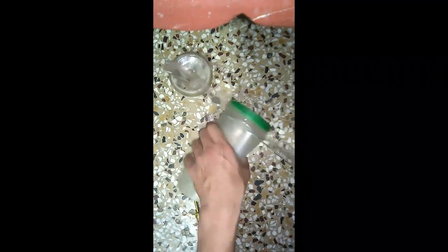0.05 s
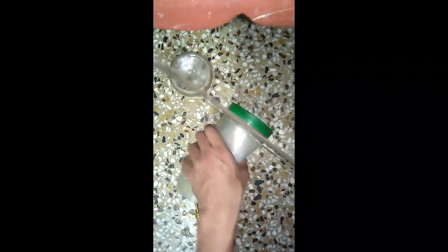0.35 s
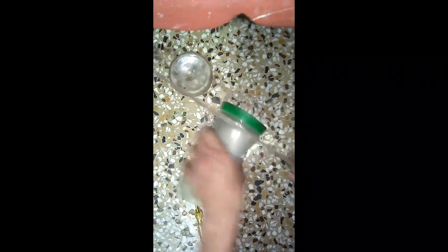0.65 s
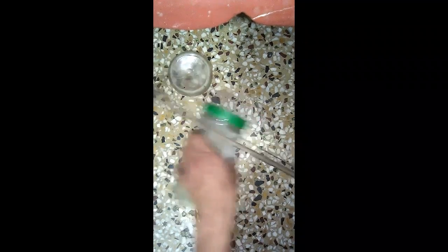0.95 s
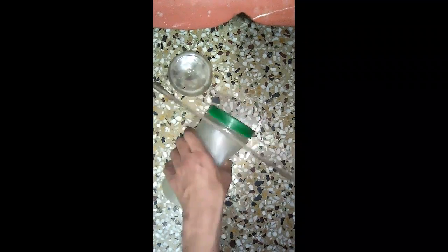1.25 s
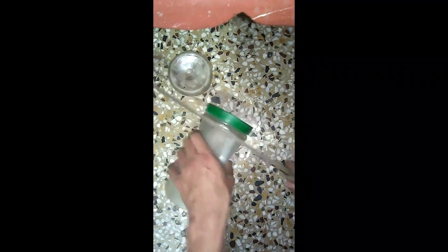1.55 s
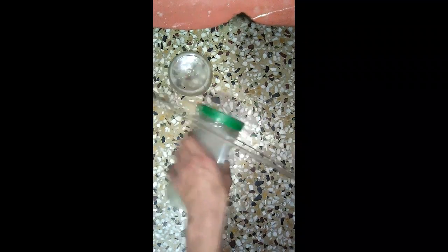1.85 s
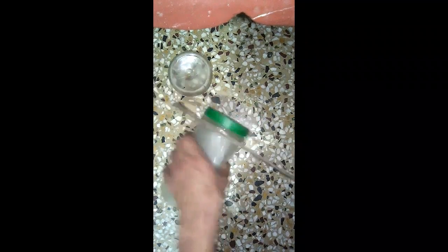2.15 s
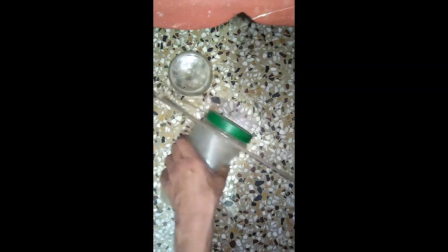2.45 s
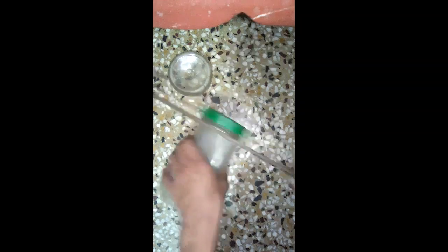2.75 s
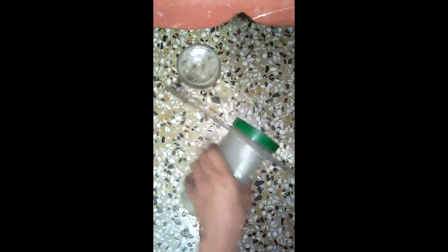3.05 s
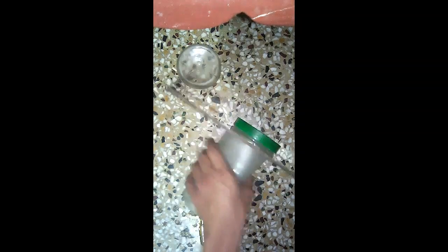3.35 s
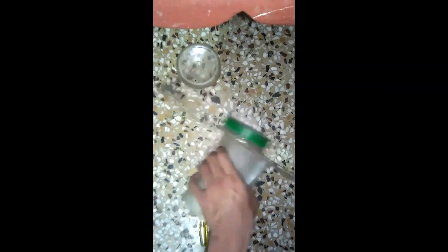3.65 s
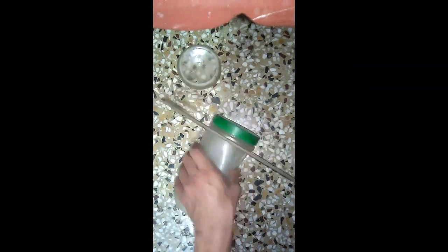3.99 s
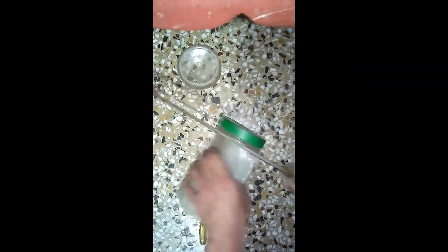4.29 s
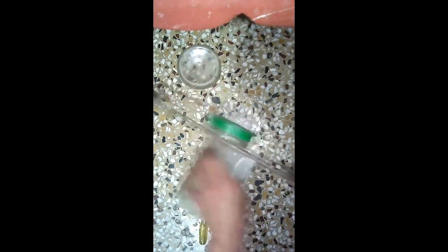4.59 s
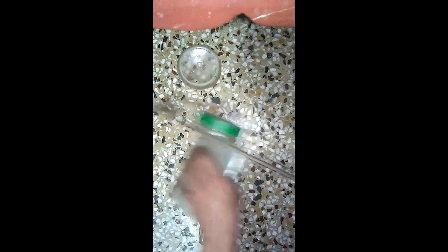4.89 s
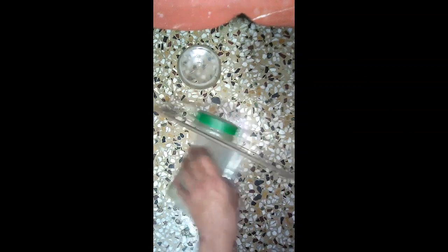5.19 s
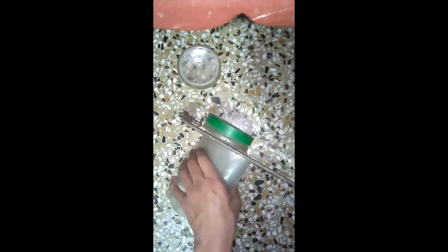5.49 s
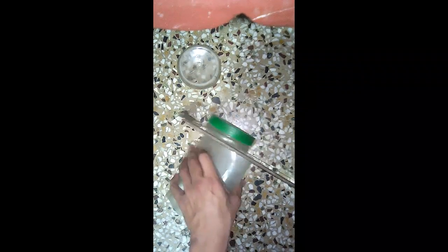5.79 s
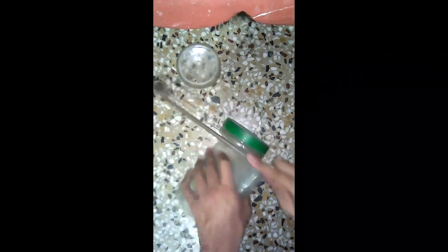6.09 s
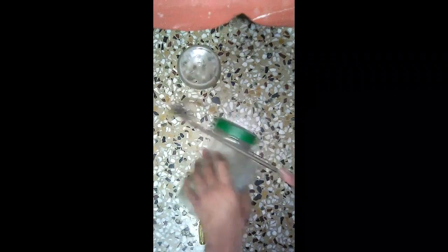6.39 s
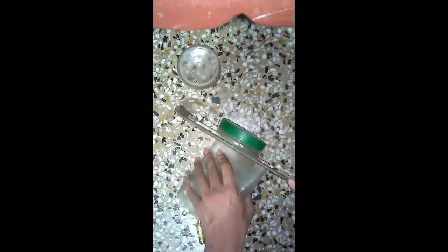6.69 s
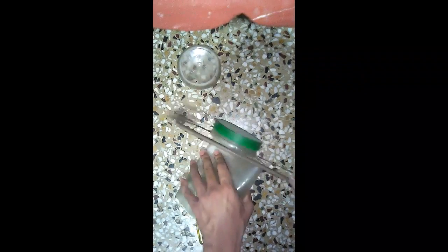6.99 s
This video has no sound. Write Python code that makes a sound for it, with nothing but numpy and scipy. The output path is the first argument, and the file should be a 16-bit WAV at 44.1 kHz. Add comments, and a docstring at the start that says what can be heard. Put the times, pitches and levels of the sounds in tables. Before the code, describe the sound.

A hand hacksaw cuts into a plastic jar with quick, hollow, rasping strokes, the blade knocking and squeaking in the slot. The sawing falters while the jar scuffs and bumps on a stone floor, then returns louder. After another pause come a few weaker strokes and faint twangs of the blade. The sound is close, in a bare, echoing room.

```python
"""Rasping, hollow hacksaw strokes bite into a plastic jar held on the stone floor of a bare, echoing room.
The teeth pluck the edge of the cut and tear off chips, and the jar rings and honks with both.
The blade knocks and squeaks in the slot and, near the end, springs free and twangs. Underneath, the jar
bumps, scuffs and rumbles on the floor. The sound is close and mono, with the loud peaks limited."""
import sys
import numpy as np
from scipy import signal
from scipy.fft import rfft, irfft
from scipy.io import wavfile
from scipy.ndimage import uniform_filter1d, minimum_filter1d

SR = 44100
rng = np.random.default_rng(int(sys.argv[2]) if len(sys.argv) > 2 else 0)


def wav_out(sig):
    """Save sig, one row per channel (or a flat mono array), as 16-bit PCM at SR to the path in sys.argv[1]."""
    wavfile.write(sys.argv[1], SR, np.round(np.clip(np.atleast_2d(sig).T, -1, 1) * 32767).astype(np.int16))


N = 314874
TAPS = 8192   # samples in one ring or hit
HZ = np.maximum(np.arange(TAPS // 2 + 1) * SR / TAPS, 1)


def from_db(db):
    """Decibels to gain."""
    return 10 ** (np.asarray(db) / 20)


def rms_one(x):
    """Scale to unit power."""
    return x / np.sqrt(np.mean(x ** 2) + 1e-20)


def at_hz(points, hz):
    """Read a curve on a log-frequency axis."""
    f, value = np.transpose(points)
    return np.interp(np.log(hz), np.log(f), value)


def lowpass(x, hz, order=1):
    """Roll off the top."""
    return signal.sosfilt(signal.butter(order, hz, fs=SR, output="sos"), x)


def add(track, start_s, sound):
    """Mix a sound into the track."""
    i = round(start_s * SR)
    lo, hi = max(i, 0), min(i + len(sound), N)
    track[lo:hi] += sound[lo - i:hi - i]


def wander(rate_hz, size):
    """Smooth random modulation of unit power."""
    knots = rng.standard_normal(4096)
    return rms_one(np.interp(np.arange(size) * rate_hz / SR, np.arange(len(knots)), knots))


def arch(length_s):
    """A smooth swell and fade of unit power."""
    return rms_one(np.sin(np.linspace(0, np.pi, round(length_s * SR))))


def response(curve_db):
    """Minimum-phase impulse response of unit energy, shaped by an EQ curve over HZ."""
    cepstrum = irfft(np.log(from_db(curve_db)))
    cepstrum[1:TAPS // 2] *= 2
    cepstrum[TAPS // 2 + 1:] = 0
    impulse = irfft(np.exp(rfft(cepstrum)))
    return impulse / np.linalg.norm(impulse)


def noise(spectrum):
    """Coloured noise of unit power."""
    return signal.fftconvolve(rng.standard_normal(N + TAPS - 1), response(at_hz(spectrum, HZ)), "valid")


def hit(grit, decay_s):
    """A click with a short tail of noise."""
    t = np.arange(TAPS) / SR
    return (t == 0) + grit * rng.standard_normal(TAPS) * np.exp(-t / decay_s)


# broad tone of the cut plastic: f/Hz, relative level/dB
PLASTIC_TONE = [(60, -47.5), (150, -34), (250, -17.5), (400, -5.5), (700, 0), (1000, -2), (2200, -3),
                (3200, -8.5), (5000, -13), (7500, -19.5), (10000, -30), (14000, -42.5)]
# peaks and dips of the jar's wall and cavity: f/Hz, width/Hz, lift/dB
JAR_MODES = [(324.7, 28.5, 9.5), (387, 126, -4.5), (433.4, 42, 9), (525, 40, 1.5), (629, 48, 5.5),
             (744, 91, 2), (807, 116, 2), (903, 117, -4), (1052, 37, 4.5), (1190, 157, 3), (1294, 35, 3),
             (1460, 51, -2), (1995, 64, 2), (4020, 120, 3.5), (6420, 370, 2)]


def jar(body_db, treble_db, honk_hz=700, honk_db=0, ripple_db=3.5, ripple_hz=380):
    """The jar rings from one pluck; grip and blade angle weight its body, treble and one honking mode."""
    detune = 1 + 0.017 * rng.standard_normal()   # the fingers flex the wall
    modes = list(JAR_MODES) + [(honk_hz, 0.19 * honk_hz, honk_db)]
    peaks = sum(lift_db / (1 + (2 * (HZ - hz * detune) / width) ** 2) for hz, width, lift_db in modes)
    plain = at_hz(PLASTIC_TONE, HZ) + peaks
    tilt = at_hz([(380, 2.0 * body_db), (700, 0.3 * body_db), (1100, 0), (2000, 0.0032),
                  (4000, treble_db), (11000, 5.1 * treble_db)], HZ)
    # the blade's many high modes shift with where it rests in the cut
    ripple = ripple_db * np.clip(HZ / 3500, 0, 1) * wander(SR * HZ[1] / ripple_hz, len(HZ))
    shaped = plain + tilt + ripple
    return response(shaped) * np.linalg.norm(from_db(shaped)) / np.linalg.norm(from_db(plain))


def pressure(length_s, run_up_s, level_db, change_db, sag_db_per_s=28):
    """Force through one stroke: it builds, leans towards entry or exit, eases midway and lets go."""
    size = round(length_s * SR)
    along = (np.arange(size) + .5) / size
    swing = np.sin(np.pi * along)
    attack = 1 - np.exp(-along * length_s / run_up_s)
    lean = from_db(change_db * along - sag_db_per_s * length_s * swing)
    return swing, attack, from_db(level_db) * rms_one(np.sqrt(swing) * attack * lean)


def teeth(per_s, jitter=.025, uneven_db=6.5, soft_hz=2200):
    """Each passing tooth plucks the edge of the cut: a buzz that follows the blade's speed."""
    size = len(per_s)
    passed = np.cumsum(per_s * (1 + jitter * wander(150, size))) / SR
    plucks = np.diff(np.floor(passed), prepend=0) - per_s / SR
    return lowpass(plucks, soft_hz) * from_db(uneven_db * wander(502, size))


def chips(speed, per_s=2600, spread_db=2.0):
    """Plastic tears in tiny snaps of uneven size, denser at speed."""
    chance, strength, sign = rng.random((3, SR))[:, :len(speed)]
    sizes = from_db(spread_db * np.minimum(-np.log(1 - strength), 4))
    return (chance < per_s * speed / SR) * sizes * np.sign(sign - .5)


def travelling(plucks, rings):
    """As the blade travels, its plucks crossfade from one ring of the jar to the next."""
    place = np.linspace(0, len(rings) - 1, len(plucks))
    return sum(signal.fftconvolve(plucks * np.maximum(1 - np.abs(place - k), 0), ring)
               for k, ring in enumerate(rings))


USUAL_DB = -14   # level of an ordinary stroke
# how the blade sits in the cut: t/s, share of evenly biting teeth/0-1
EVEN_BITE = [(0.3, 0.54), (1.099, 0), (3.7, 0.3), (4.2, 0.7), (4.9, 0), (5.3, 0.57), (6.2, 0.15), (7.0, 0)]
# saw strokes, each bringing out one wall resonance, its honk: t/s, length/s, run-up/s, level/dB,
# entry-to-exit lean/dB, body/dB, treble/dB, honk f/Hz, honk lift/dB
STROKES = [(-0.079,0.12,0.0014,-18.5,21,4.5,0,500,0.5), (0.226,0.15,0.016,-11.5,-1,6,-0.5,507,2.5),
           (0.448,0.18,0.0084,-19,-4.5,3,-0.5,534,7), (0.68,0.15,0.02,-10.5,-6,4.5,-0.5,800,5),
           (0.876,0.21,0.0037,-17.5,-14.5,1.5,0,497,5.5), (1.089,0.11,0.004,-16,-18,1.5,-0.5,1070,3),
           (1.254,0.13,0.0039,-22.5,-20,2,-1,445,8.5), (1.522,0.079,0.0017,-25.5,-1,7,0.5,1250,6),
           (1.567,0.15,0.025,-14.5,-0.5,2,0,580,8), (1.755,0.27,0.0037,-19.5,-8,2,0,494,4),
           (2.011,0.15,0.0025,-14.5,-15,3,0.5,618,6.5), (2.164,0.19,0.013,-15.5,-8.5,0,-2,1228,3.5),
           (2.34,0.17,0.018,-9.5,-12,1,1.5,1220,-2), (2.553,0.18,0.023,-12.5,-21.5,1.5,1,1650,0.5),
           (2.744,0.14,0.01,-9.5,-12,2.5,0,730,4), (2.914,0.14,0.011,-26.5,-1,-3.5,-1,695,4),
           (3.175,0.068,.004,-35,-12,2.5,-2,1180,-1), (3.242,0.045,0.0031,-28.5,-12,-0.5,-8,1260,-7),
           (3.468,0.22,.004,-34.5,-32,-1.5,-4,530,10.5), (3.684,0.13,0.0056,-29,5,5.5,0,1250,1.5),
           (4.096,0.22,0.0074,-15.5,-3,1,0.5,1250,6), (4.297,0.22,0.0076,-14.5,-4,0.5,0,1090,4),
           (4.5,0.15,0.015,-12,-23.5,1,1,1006,11), (4.678,0.14,0.0044,-9,-6,0.5,-0.5,845,10),
           (4.853,0.13,0.0078,-12,-8,2,-1,700,8), (5.019,0.11,0.0027,-10.5,-21,0,-0.5,1050,2.5),
           (5.171,0.1,0.0048,-11.5,1,-1.5,-1,710,4.5), (5.312,0.12,0.0068,-8,-15,1.5,0,1640,8),
           (5.486,0.094,0.011,-16,-6,-5.5,-2,644,8), (6.114,0.23,0.025,-19.5,-7,-5.5,-1,695,5),
           (6.334,0.18,0.034,-14,-7.5,-2.5,-2,680,1), (6.559,0.12,0.0075,-31.5,0,1,-2,640,11),
           (6.921,0.088,0.006,-33,-19,-1,-2.5,820,10), (7.094,0.093,.008,-48,-8,6.5,3,1200,13)]


def sawing(teeth_per_s=900, teeth_db=-8.0, chips_db=0.57, judder_db=0.5, catch_db=0.6,
           honk_glide=0.024, honk_waver=0.059, slow_cut_hz=1800):
    """Tooth buzz and chips ring the jar; the blade speeds up, slows down and judders as it binds."""
    out = np.zeros(N)
    for start, length, run_up_s, level_db, change_db, body_db, treble_db, honk_hz, honk_db in STROKES:
        swing, attack, force = pressure(length, run_up_s, level_db, change_db)
        size, speed = len(swing), swing ** .3
        even = np.interp(start, *np.transpose(EVEN_BITE))
        binding = rms_one(from_db(judder_db * wander(190, size) + catch_db * wander(58, size)))
        rings = []
        for place in np.linspace(-.5, .5, 8):   # entry to exit
            bend = 1 + honk_glide * place + honk_waver * rng.standard_normal()
            rings.append(jar(body_db, treble_db, honk_hz * bend, honk_db))
        pace = from_db(.33 * (level_db - USUAL_DB))   # harder strokes run faster
        buzz = teeth(teeth_per_s * pace * speed)
        buzz *= np.linalg.norm(rings[0]) / np.std(travelling(buzz, rings)[:size])   # level with the snaps
        snaps = rms_one(chips(speed))
        rasp = from_db(teeth_db) * np.sqrt(even) * buzz + from_db(chips_db) * np.sqrt(1 - even) * snaps
        dull = lowpass(rasp, slow_cut_hz)
        brightness = attack ** 2 * swing ** 0.034   # a slow blade plucks softly, a fast one snaps
        rasp = dull + brightness * (rasp - dull)
        add(out, start, travelling(force * binding * rasp, rings))
    return out


# low end of the jar shaking on the floor: f/Hz, relative level/dB
SHAKE_TONE = [(20, -31), (55, -9), (100, 7), (165, 4.5), (240, 12), (450, -31), (2000, -62)]


def floor_shake(base_db=-55, db_per_level_db=3.5, db_per_body_db=1.44):
    """Hard strokes shake the jar against the floor, most in mid-stroke."""
    push = np.zeros(N)
    for start, length, _, level_db, _, body_db, *_ in STROKES:
        push_db = base_db + db_per_level_db * (level_db - USUAL_DB) + db_per_body_db * body_db
        add(push, start, from_db(push_db) * arch(length))
    return push * noise(SHAKE_TONE)


# reverb decay: f/Hz, T60/s
ROOM_T60 = [(150, 0.47), (500, 0.49), (1400, 0.48), (3700, 0.48), (9000, 0.28)]
# standing waves between the walls: f/Hz, lift/dB
ROOM_MODES = [(160, 5), (224, 8.5), (279, 7), (515, 6), (533, 6), (575, -3), (631, 0), (700, 6.5), (812, 3),
              (1084, -1), (1218, 7), (1293, -4), (1415, 10.5)]


def room(x, first_echo_s=0.0048, smooth_hz=14, mode_width_hz=6):
    """Hard walls return a dense tail, each octave dying at its own pace; standing waves colour it."""
    t, bin_hz = np.arange(SR) / SR, np.arange(SR // 2 + 1)
    white = rfft(rng.standard_normal(SR))
    octave = np.round(np.log2(np.maximum(bin_hz, 64)))
    tail = sum(irfft(white * (octave == k), SR) * from_db(-60 * t / at_hz(ROOM_T60, 2 ** k))
               for k in np.unique(octave))
    build_up = np.clip(t / first_echo_s - 1, 0, 1)
    spectrum = rfft(tail * build_up)
    spectrum /= np.sqrt(uniform_filter1d(np.abs(spectrum) ** 2, smooth_hz))   # flatten the overall tone
    spectrum *= from_db(sum(db / (1 + (2 * (bin_hz - hz) / mode_width_hz) ** 2) for hz, db in ROOM_MODES))
    tail = (irfft(spectrum, SR) * build_up)[:SR * 3 // 4]
    return signal.fftconvolve(x, tail / np.linalg.norm(tail))[:N]


# room tone: f/Hz, relative level/dB
AIR_TONE = [(30, -3), (120, 21), (350, 30), (700, -27), (1500, -22), (4000, -47), (12000, -66)]


def still_air(level_db=-58.5):
    """The air of the room lays a faint, low, steady bed."""
    return from_db(level_db) * noise(AIR_TONE)


# rumble of the holding hand: f/Hz, relative level/dB
HAND_TONE = [(20, -28), (55, -0.5), (100, -0.5), (160, -20), (240, -13), (450, -27), (2000, -56.5)]
# the hand shifts the jar: t/s, length/s, rumble level/dB, scuff level/dB
HAND_SHIFTS = [(1.375, 0.19, -50, -51), (1.626, 0.1, -42, -42.5), (2.424, 0.061, -45, -45),
               (2.885, 0.19, -43.5, -62), (3.454, 0.075, -44, -33.5), (3.586, 0.095, -50, -45),
               (3.834, 0.11, -52, -44), (3.929, 0.23, -47.5, -40.5), (4.076, 0.075, -38, -44),
               (5.847, 0.25, -63.5, -71), (6.861, 0.076, -68, -35.5), (7.014, 0.07, -56, -51)]


def handling(tremor_db=-66, swing_db=4.5, soft_hz=1100, scuffs_per_s=250):
    """The holding hand rumbles faintly; as it shifts, the rumble swells and the jar scuffs the stone."""
    effort, scuffs = from_db(tremor_db + swing_db * wander(6.6, N)), np.zeros(N)
    for start, length, rumble_db, scuff_db in HAND_SHIFTS:
        move = arch(length)
        add(effort, start, from_db(rumble_db) * move)
        grit = rms_one(move * chips(move, scuffs_per_s))
        add(scuffs, start, from_db(scuff_db) * signal.fftconvolve(grit, jar(0, 0)))
    return effort * noise(HAND_TONE), lowpass(scuffs, soft_hz, order=2)


# dull thuds of the rocking jar: t/s, peak level/dB
BUMPS = [(0.224, -19), (3.985, -23), (4.088, -17), (6.892, -26.5)]


def bumps(soft_hz=900):
    """Cushioned by the hand, the jar tips onto the stone and rocks briefly, ringing its low modes."""
    out = np.zeros(N)
    for start, peak_db in BUMPS:
        blow = hit(grit=0.33, decay_s=0.014)
        thud = lowpass(signal.fftconvolve(blow, jar(0, 0)), soft_hz, order=3)
        add(out, start, from_db(peak_db) * thud / np.abs(thud).max())
    return out


# the blade catches in the slot or knocks the jar: t/s, attack level/dB, treble/dB, honk f/Hz
KNOCKS = [(0.244,-18.5,2.5,600), (0.688,-14.5,0.5,730), (1.291,-21,2.5,1280), (1.525,-24,1,520),
          (1.594,-14.5,2,1070), (1.979,-26,-3,780), (2.019,-14.5,4,3020), (2.198,-17,1,2180),
          (3.181,-36,-5,1200), (3.227,-33,-12,600), (3.248,-24,-10,1690), (3.272,-27,-11,1200),
          (3.473,-29.5,-13,670), (3.559,-30,1,527), (3.694,-27,2,567), (4.521,-13,-6,1200),
          (4.695,-6,-4,1030), (4.867,-14.5,0,694), (5.021,-10,1,2800), (5.318,-4,2,2870),
          (6.169,-8.5,0.5,1133), (6.380,-17,1.5,700), (6.924,-22,-4,740)]


def knocks(body_db=1.0, honk_db=11.5, soft_hz=4500, attack_s=.01):
    """A tooth catches and lets go: one hard pluck and a short crunch set the wall honking."""
    out = np.zeros(N)
    for start, level_db, treble_db, honk_hz in KNOCKS:
        blow = lowpass(hit(grit=0.59, decay_s=0.005), soft_hz)   # plastic yields a little
        knock = signal.fftconvolve(blow, jar(body_db, treble_db, honk_hz, honk_db))
        add(out, start, from_db(level_db) * knock / np.std(knock[:round(attack_s * SR)]))
    return out


# chirps of the binding blade: t/s, length/s, f/Hz, level before boost/dB, overtones/dB
SQUEAKS = [(0.499, 0.054, 591, -21, -7), (1.784, 0.034, 482.5, -24, -8.5), (1.789, 0.019, 1192, -26.5, -10),
           (1.829, 0.029, 945, -17.5, -10), (1.863, 0.016, 940, -23, -1.5), (1.89, 0.0099, 492, -13.5, -16),
           (1.904, 0.032, 1870, -26.5, -12), (2.195, 0.069, 2264, -24.5, -19),
           (2.365, 0.033, 1190, -22, -26), (2.783, 0.031, 1220, -19, -1.5), (3.556, 0.053, 6180, -51, -32),
           (4.357, 0.04, 1054, -20, -14), (4.414, 0.017, 1121, -18, -7)]


def squeaks(boost_db=5.5, glide=0.086, waver=0.035, flutter_db=2.5, third_db=-12):
    """The blade's flank sticks and slips on the plastic: a brief, wavering tone that bends upwards."""
    out = np.zeros(N)
    for start, length, hz, level_db, overtones_db in SQUEAKS:
        size = round(length * SR)
        along = (np.arange(size) + .5) / size
        pitch_hz = hz * (1 + glide * (along - .5) + waver * wander(303, size))
        phase = 2 * np.pi * np.cumsum(pitch_hz) / SR
        overtones = np.sin(2 * phase) + from_db(third_db) * np.sin(3 * phase)
        tone = np.sin(phase) + from_db(overtones_db) * overtones
        envelope = np.sin(np.pi * along) * from_db(flutter_db * wander(170, size))
        add(out, start, from_db(level_db + boost_db) * rms_one(tone * envelope))
    return out


# bending modes of the blade: f/Hz, relative level/dB, T60/s
BLADE_MODES = [(706, 1, 0.13), (1614, -1, 0.045), (2430, -0.5, 0.022), (2515, -8.5, 0.025)]
# the blade springs free sideways: t/s, peak level/dB, pitch/ratio, upper modes/dB
TWANGS = [(5.852, -23.5, 1.0, -2.5), (5.876, -28, 1.0, 4), (5.899, -33.5, 0.99, -13),
          (6.113, -27.5, 0.94, -18), (6.925, -24, 1.14, -12), (6.962, -33, 1.05, 6),
          (7.095, -27.5, 0.98, -21), (7.125, -23, 1.13, -8)]


def twangs(band_hz=(500, 3000)):
    """The thin steel blade rings in its bending modes and rattles against the sides of the slot."""
    out, t = np.zeros(N), np.arange(TAPS) / SR
    for start, peak_db, pitch, upper_db in TWANGS:
        ring = sum(from_db(db + upper_db * (k > 0) - 60 * t / t60) * np.sin(2 * np.pi * hz * pitch * t)
                   for k, (hz, db, t60) in enumerate(BLADE_MODES))
        ring = signal.sosfilt(signal.butter(2, band_hz, "band", fs=SR, output="sos"), ring)
        twang = signal.fftconvolve(hit(grit=0.07, decay_s=0.008), ring)
        add(out, start, from_db(peak_db) * twang / np.abs(twang).max())
    return out


def scene(direct_db=-4, reverb_db=-4):
    """Saw and jar with their reverb, over floor shake, hand rumble and room tone, panned centre."""
    rumble, scuffs = handling()
    work = sawing() + squeaks() + knocks() + bumps() + twangs() + scuffs
    in_room = from_db(direct_db) * work + from_db(reverb_db) * room(work)
    mono = in_room + floor_shake() + rumble + still_air()
    return np.array([mono, mono])


def record(dry, ceiling=.5, release_db_per_s=1200, cutoff_hz=14300):
    """A fast limiter holds the peaks down, then a steep filter cuts the top."""
    over_db = np.maximum(20 * np.log10(np.abs(dry).max(axis=0) / ceiling + 1e-9), 0)
    release_db = release_db_per_s * np.arange(N) / SR
    reduction_db = np.maximum.accumulate(over_db + release_db) - release_db
    gain_db = uniform_filter1d(minimum_filter1d(-reduction_db, size=21), size=21)
    high_cut = signal.ellip(12, .1, 80, cutoff_hz, fs=SR, output="sos")
    return signal.sosfilt(high_cut, dry * from_db(gain_db))


dry = scene()
out = record(dry)
wav_out(out)
```